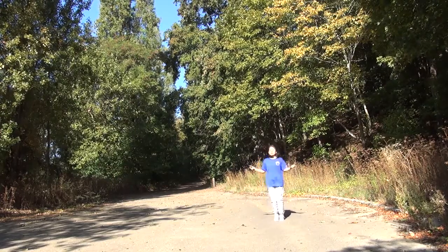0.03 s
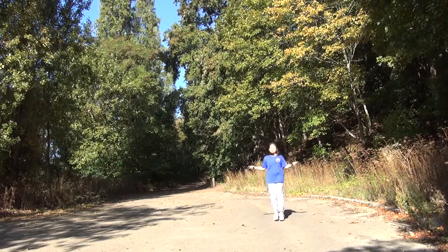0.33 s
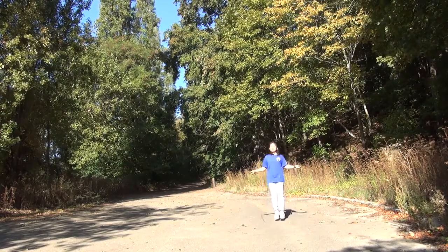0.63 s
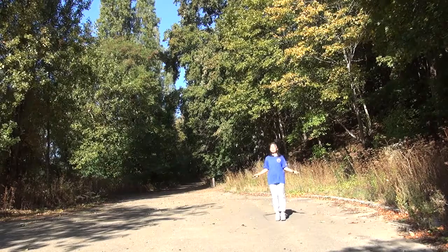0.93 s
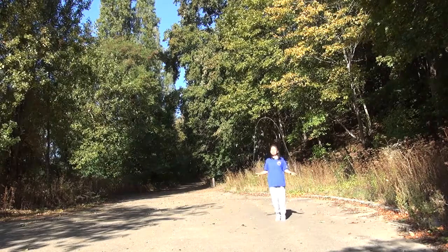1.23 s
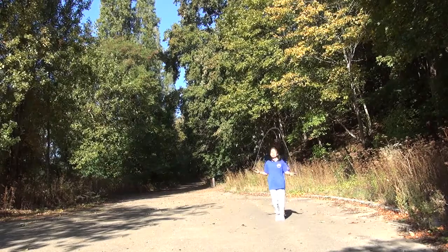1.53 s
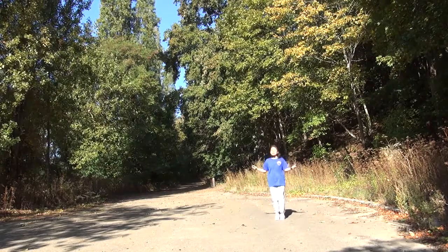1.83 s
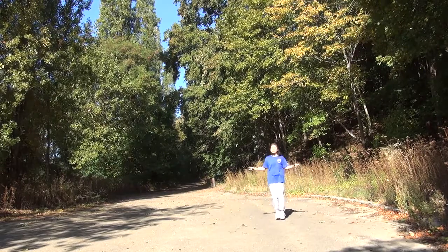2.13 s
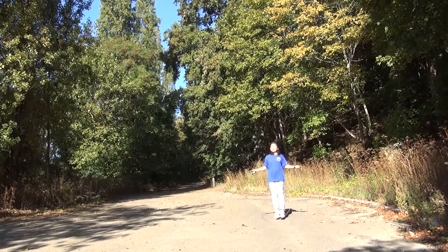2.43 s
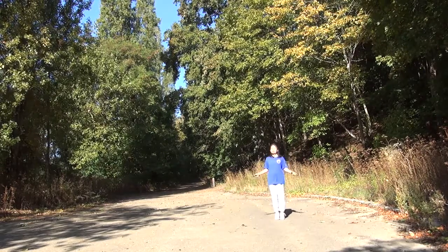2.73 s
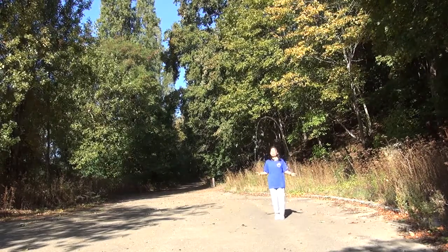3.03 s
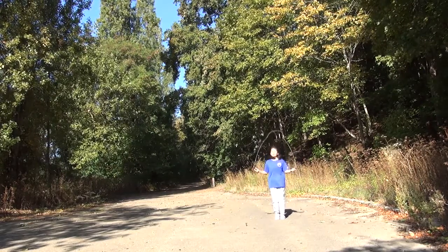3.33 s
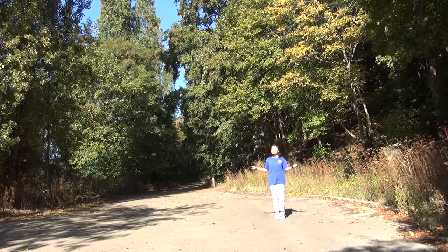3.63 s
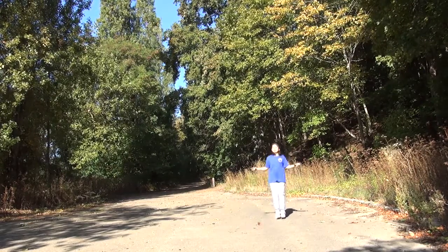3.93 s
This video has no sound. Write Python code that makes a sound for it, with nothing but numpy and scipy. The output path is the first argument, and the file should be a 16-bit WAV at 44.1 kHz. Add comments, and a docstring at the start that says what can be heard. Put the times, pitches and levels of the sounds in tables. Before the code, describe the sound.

A skipping rope cracks steadily on pavement, with airy swishes and soft landings outdoors.

```python
"""A paved path among trees, with someone skipping rope a little to the right of a stereo microphone pair.
Nearly three turns a second: the cord cracks on the pavement, skitters over the grit and sings as it
sheds eddies in the air; after each crack the shoes land softly. From farther off the brush and trees
scatter a faint echo, over a low breeze and the hiss of leaves."""
import sys
import numpy as np
from scipy.fft import rfft, irfft, next_fast_len
from scipy.io import wavfile
from scipy.ndimage import uniform_filter1d

SR = 44100
rng = np.random.default_rng(int(sys.argv[2]) if len(sys.argv) > 2 else 0)


def put_to_file(sound):
    """Save the sound as 16-bit audio at rate SR, in the file named by the first command-line argument."""
    columns = np.atleast_2d(sound).T  # one column per channel
    safe = np.clip(columns, -1, 1)
    whole_steps = np.round(safe * 32767)
    wavfile.write(sys.argv[1], SR, whole_steps.astype(np.int16))


N = 176400


# Rope on the pavement, in the foreground: (time [s], level [dB] at each of SLAP_HZ, gap between touches [s])
SLAPS = [(.0019, 0, -4, -3, -6, 1.9, -11, -13, 0.00145), (0.3797, 4, -7, -18, -4.5, 6.5, 0.5, -16, 0.00037),
         (.732, -13, -1, 10.5, -4.5, 15.5, 7.5, -6.5, 0.00029),
         (1.091, -8, 7.5, 18, 6, 9.4, 5.5, -10, .0002), (1.4605, 2, 8, 8, 2.5, 12, 7.5, -23, .0001),
         (1.8254, 3, -7, 3.5, 2, 2.1, -4.5, -19, .0003), (2.1817, -11, 4, 5, 6, 2.1, -2.5, -1, 0.00072),
         (2.5439, 4.5, 5, 1.5, 15.5, 8, 1, 2.5, 0.00033),
         (2.8992, -3, 13.5, 10.5, 8.5, 5.4, 12, -3.5, 0.00037), (3.258, 8, 14.5, 13, 5, 3, 17, 4, 0.00069),
         (3.6265, 10, 5.5, 4, 2, 16.6, 3.5, -0.5, .0002)]
SLAP_HZ = [1050, 1850, 3000, 4600, 6400, 8700, 11800]  # bands of the crack: (frequency [Hz])
SKID_SPECTRUM = [(150, -13), (600, -2), (1500, 2.5), (3000, 0), (4500, 0.5), (6800, 2.5), (9000, 0.5),
                 (12000, -10.5), (15500, -26)]  # cord over grit: (frequency [Hz], level [dB])
FOLLOW = 0.43  # dB of skid and echo for each dB of the crack

def rope_slaps(tick_count=8, ticks_span_s=0.016, skid_t60=0.03, crush_t60=0.0015):
    """The loop touches twice in one crack, crushing grit, then skids on with a few ticks and a scrape."""
    out, t = np.zeros(N), np.arange(SR // 20) / SR
    fade = amp(-60 * t / skid_t60)
    for at, *levels, gap in SLAPS:
        crack = amp(-1) * noise_burst(t, crush_t60)
        crack[0] += amp(-8)  # light first touch
        crack[round(gap * SR)] += 1  # main touch
        colour = [(100, levels[0] - 34), (500, levels[0] - 20), *zip(SLAP_HZ, levels),
                  (15500, levels[-1] - 11)]
        add(out, at - gap, strike(crack, colour, smooth_hz=1560))
        ticks = np.zeros(len(t))
        tick_times = ticks_span_s * (np.arange(tick_count) + rng.random(tick_count)) / tick_count
        ticks[(tick_times * SR).astype(int)] = rng.standard_normal(tick_count)
        skid = unit_energy(ticks * fade) + amp(-0.5) * noise_burst(t, skid_t60)
        skid_gain = amp(0.5 + FOLLOW * (np.mean(levels) - 3))
        add(out, at + 0.001035, skid_gain * strike(skid, SKID_SPECTRUM, smooth_hz=3060))
    return out


# Each pass of the cord over the path: (time at the bottom [s], level [dB], downswing boost [dB])
TURNS = [(.002, -5, 2), (0.382, -5, 2), (.732, -3.5, -1.5), (1.1, 0, -6.5), (1.464, -1.5, 1),
         (1.83, -3.5, -3), (2.18, -2, -0.5), (2.544, -1.5, -1), (2.898, 0, 0.5), (3.262, 0.5, 0.5),
         (3.626, -3, 1.5), (3.997, -2.5, 5)]
# Air tone through one turn: (time from the bottom [s], pitch [Hz], level [dB])
AIR_TONE = [(-.225, 575, -43.5), (-.175, 620, -37), (-.135, 632, -42.5), (-.09, 660, -28.5),
            (-.065, 640, -41.5), (-.036, 595, -24), (-.004, 631, -35.5), (.028, 579, -44),
            (0.059, 562, -34), (.09, 550.5, -33.5), (.135, 586, -44.5)]
# Its brief overtones: (pitch multiple, time from the bottom [s], half-width [s], level [dB])
OVERTONES = [(2.1, -0.14, 0.021, -43.5), (1.95, -0.066, 0.041, -50), (2.85, -0.087, 0.019, -51)]
WAKE_SPECTRUM = [(300, -12), (700, 6.5), (1300, 0), (1850, -0.5), (2600, -7), (6000, -25), (16000, -30)]  # turbulence behind the cord: (frequency [Hz], level [dB])

def cord_swish(downswing_at_s=-0.056, downswing_width_s=0.024, wake_db=-44):
    """The cord sheds eddies: a tone that follows its speed, passing overtones and a rush of air."""
    t = np.arange(N) / SR
    bell = lambda centre, width: np.exp(-.5 * ((t - centre) / width) ** 2)
    swell = lambda offset, width: sum(amp(lift) * bell(at + offset, width) for at, lift, _ in TURNS)
    points = sorted((at + offset, hz, db + lift) for at, lift, _ in TURNS for offset, hz, db in AIR_TONE)
    times, pitches, levels = np.transpose(points)
    pitch = np.interp(t, times, pitches)
    boost_db = sum(boost * bell(at + downswing_at_s, downswing_width_s) for at, _, boost in TURNS)
    gain = amp(np.interp(t, times, levels) + boost_db)
    core = eddies(pitch, width_hz=43, steadiness=0.36)
    skirt = amp(-4) * eddies(pitch, width_hz=85.5)
    overtones = sum(amp(db) * swell(offset, width) * eddies(multiple * pitch, width_hz=77)
                    for multiple, offset, width, db in OVERTONES)
    wake = amp(wake_db) * swell(offset=-0.084, width=0.08) * stereo_noise(WAKE_SPECTRUM)[0]
    return gain * (core + skirt) + overtones + wake


# Shoes and cord on the same spot of pavement: (time [s], level [dB] at each of TAP_HZ)
LANDINGS = [(.0912, 6, -5, -6, -22), (.4663, 9, 1.5, -11, -30), (.8155, 3, -4, -4, -14),
            (.8271, 5.5, 8.5, -8, -18), (1.1701, 5, -8, -2.5, -23), (1.1845, 5, 1, -4.5, -18),
            (1.5383, 12, -1.5, -2.5, -23), (1.9046, 18, 8, -1, -14.5), (2.2546, -8, -1, -2, -18),
            (2.2708, 8.5, 7, 3, -14), (2.6472, 10.5, -8, -7, -18), (3.0227, 14, 4, 0.5, -28),
            (3.3675, 4, -2, 2, -21), (3.3775, 14.5, 11, 1.5, -21), (3.7348, 12.5, 5, 3, -36),
            (3.7402, 12, -9, -31, -5.5)]
REBOUNDS = [(.0342, -27, -6, -8.5, -9), (1.8475, -2, 15, 6, -8), (2.2047, -12, 5, -12, -9),
            (2.9285, -7, 7, -7, -3)]
TAP_HZ = [330, 1150, 2400, 5600]  # bands of a dull contact: (frequency [Hz])

def shoes_and_rebounds():
    """The cord bounces after some of the slaps, and soft soles come down after every one."""
    return taps(REBOUNDS, scuff_db=-2, scuff_t60=0.016) + taps(LANDINGS, scuff_db=1, scuff_t60=0.019)


GRIT_TICK = [-5, -14, -9.5, -25.5]  # a small stone on the path: (level [dB] at each of TAP_HZ)

def loose_grit(count=14, spread_db=5):
    """Small stones tick as they are flicked aside at random moments."""
    rows = [(when * N / SR, *(np.array(GRIT_TICK) + spread_db * (strength - .5)))
            for when, strength in rng.random((count, 2))]
    return taps(rows, scuff_db=1, scuff_t60=0.019)


ECHO_SPECTRUM = [(200, 4.5), (1200, 9.5), (3000, 1.5), (6500, -1), (9000, -3.5), (15000, -16)]  # scatter from around the path: (frequency [Hz], level [dB])

def tree_echo(level_db=-46, brush_db=4.5, brush_t60=0.17, trees_t60=1):
    """Each slap comes back diffusely, first from the nearby brush and then from the trees."""
    gain, t = np.zeros(N), np.arange(SR) / SR
    onset = 1 - np.exp(-t / 0.004)
    tail = onset * (amp(-60 * t / trees_t60) + amp(brush_db - 60 * t / brush_t60))
    for at, *levels, _ in SLAPS:
        add(gain, at, amp(level_db + FOLLOW * np.mean(levels)) * tail)
    return gain * stereo_noise(ECHO_SPECTRUM)


# Breeze, one gust and a high rustle behind the skipper: (time [s], level [dB])
BREEZE_LEVEL = [(0, -41.5), (.45, -41), (.62, -46), (.85, -53), (1.15, -48.5), (1.5, -80), (2.1, -49),
                (3.5, -61), (3.8, -46), (4, -42.5)]
GUST_LEVEL = [(1.85, -68), (1.95, -46.5), (2.67, -45), (2.85, -68)]
RUSTLE_LEVEL = [(0, -60), (2.3, -53.5), (2.8, -49), (4, -49)]
# Their colours, and the steady hiss of the trees all around: (frequency [Hz], level [dB])
BREEZE_SPECTRUM = [(20, -28), (40, -18), (80, -3.5), (180, -5.5), (260, -14.5), (450, -28.5), (1200, -66)]
GUST_SPECTRUM = [(100, -13), (195, 21), (400, -18.5)]
RUSTLE_SPECTRUM = [(800, -2.5), (3000, 3), (7000, -4.5), (10000, -7), (15500, -17)]
HISS_SPECTRUM = [(30, -8.5), (200, 3.5), (400, 4.5), (1000, -1.5), (2000, -4.5), (4000, -13), (7000, -15.5),
                 (10000, -20.5), (15500, -23)]

def breeze_and_leaves(hiss_db=-47.5, grain_db=2.5):
    """A low breeze comes and goes under the hiss of leaves and a grainy high rustle."""
    envelope = lambda curve: amp(np.interp(np.arange(N) / SR, *np.transpose(curve)))
    flicker = unit_rms(uniform_filter1d(rng.standard_normal(N), size=130))
    grain = unit_rms(amp(grain_db * flicker))
    breeze = envelope(BREEZE_LEVEL) * stereo_noise(BREEZE_SPECTRUM)
    gust = envelope(GUST_LEVEL) * stereo_noise(GUST_SPECTRUM)
    hiss = amp(hiss_db) * stereo_noise(HISS_SPECTRUM)
    rustle = envelope(RUSTLE_LEVEL) * grain * stereo_noise(RUSTLE_SPECTRUM)
    return breeze + gust + hiss + rustle


# Diffuse sound across the microphone pair: (frequency [Hz], left-right correlation [0-1])
COHERENCE = [(60, 0.91), (130, 0.62), (290, 1), (640, 0.95), (3100, 0.99), (6800, 0.76), (15000, 0.067)]

def stereo_noise(spectrum):
    """Noise of rms 1, mostly alike at both microphones but unrelated in the top treble."""
    def response(hz):
        angle = np.arccos(along(COHERENCE, hz)) / 2
        return amp(along(spectrum, hz)) * [np.cos(angle), np.sin(angle)]
    mid, side = filtered(rng.standard_normal((2, N)), response)
    return unit_rms(np.array([mid + side, mid - side]))


def eddies(pitch, width_hz, steadiness=0):
    """Narrow noise of rms 1 around a moving pitch; steadiness evens out its level."""
    real, imag = filtered(rng.standard_normal((2, N)), lambda hz: 1 / (1 + (hz / width_hz) ** 3))
    wander = real + 1j * imag
    carrier = np.exp(2j * np.pi * np.cumsum(pitch) / SR)
    return unit_rms((wander / np.abs(wander) ** steadiness * carrier).real)


def taps(rows, scuff_db, scuff_t60):
    """Dull contacts: one push and a short scuff."""
    out, t = np.zeros(N), np.arange(SR // 16) / SR
    for at, *levels in rows:
        force = amp(scuff_db) * noise_burst(t, scuff_t60)
        force[0] += 1
        colour = [(50, levels[0] - 36), (180, levels[0] - 4), *zip(TAP_HZ, levels),
                  (15000, levels[-1] - 17)]
        add(out, at, strike(force, colour, smooth_hz=676))
    return out


def strike(force, colour, smooth_hz, size=4096):
    """A contact force, its spectrum broadly flattened, then given a (Hz, dB) colour."""
    spectrum = rfft(force, size)
    power = np.abs(uniform_filter1d(np.abs(spectrum) ** 2, int(smooth_hz * size / SR)))
    gain = amp(along(colour, np.fft.rfftfreq(size, 1 / SR))) / np.sqrt(power + 1e-9)
    cepstrum = irfft(np.log(gain + 1e-6))
    cepstrum[1:size // 2] *= 2  # minimum phase: nothing sounds before the contact
    cepstrum[size // 2 + 1:] = 0
    return irfft(spectrum * np.exp(rfft(cepstrum)))


def amp(db):
    return 10 ** (np.asarray(db) / 20)


def unit_rms(x):
    return x / np.sqrt(np.mean(x ** 2) + 1e-20)


def unit_energy(x):
    return x / np.sqrt(np.sum(x ** 2) + 1e-20)


def noise_burst(t, t60):
    """Noise of energy 1 that falls 60 dB in t60 seconds."""
    return unit_energy(rng.standard_normal(len(t)) * amp(-60 * t / t60))


def along(points, hz):
    """Interpolate (Hz, value) points on a log frequency axis."""
    freqs, values = np.transpose(points)
    return np.interp(np.log(hz + 1), np.log(freqs + 1), values)


def filtered(x, response):
    """Pass x through a frequency response."""
    size = next_fast_len(N + SR // 2)
    return irfft(rfft(x, size) * response(np.fft.rfftfreq(size, 1 / SR)), size)[..., :N]


def add(track, at, x):
    """Mix x into the track, starting at a time in seconds."""
    start = max(0, round(at * SR))
    part = track[..., start:start + x.shape[-1]]
    part += x[..., :part.shape[-1]]


def scene():
    """The skipper at one spot on the path, with echo and wind spread around."""
    skipper = rope_slaps() + shoes_and_rebounds() + loose_grit() + cord_swish()
    return skipper + tree_echo() + breeze_and_leaves()


# Left microphone, the farther from the skipper: (frequency [Hz], level against the right [dB])
LEFT_MIC = [(100, -11), (250, -8), (600, -4.5), (1500, -7.5), (4200, -7), (6300, -2), (8000, -3.5),
            (10500, -7), (12000, -12), (15000, -17)]

def record(dry, left_lag_s=1.5e-5, top_hz=15900):
    """The left microphone is weaker, duller and slightly late; peaks clip and the top treble is cut."""
    def pair(hz):
        left = amp(along(LEFT_MIC, hz)) * np.exp(-2j * np.pi * hz * left_lag_s)
        return np.array([left, np.ones_like(hz)])
    clipped = np.clip(filtered(dry, pair), -1, 1)
    return filtered(clipped, lambda hz: hz < top_hz)


dry = scene()
out = record(dry)
put_to_file(out)
```